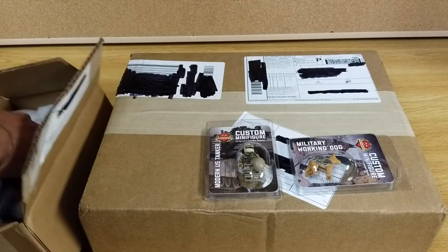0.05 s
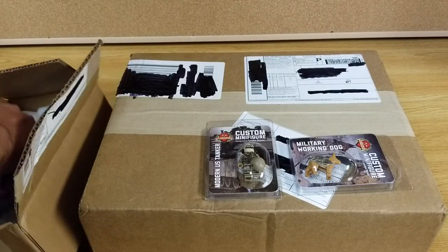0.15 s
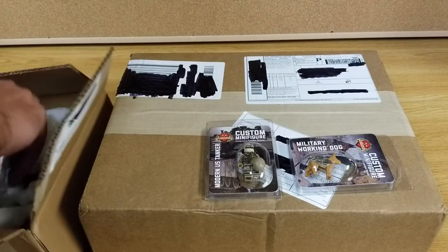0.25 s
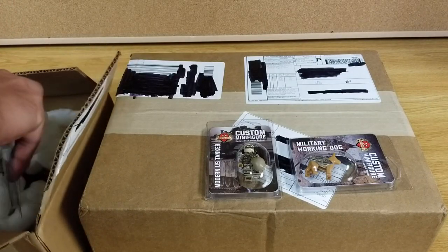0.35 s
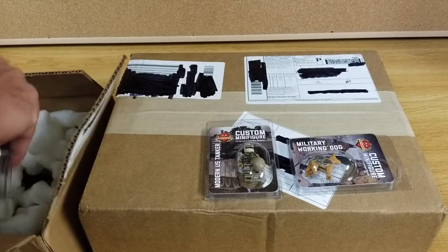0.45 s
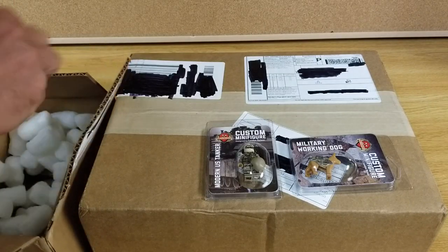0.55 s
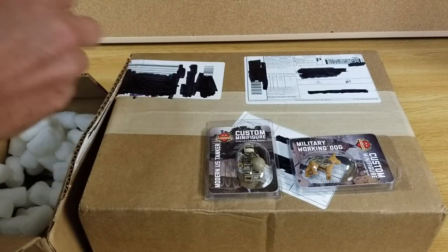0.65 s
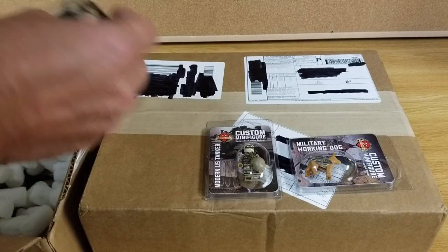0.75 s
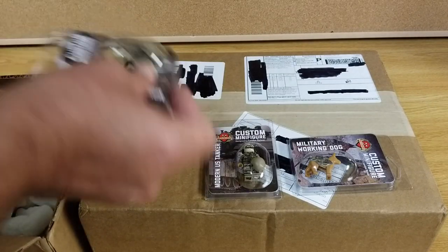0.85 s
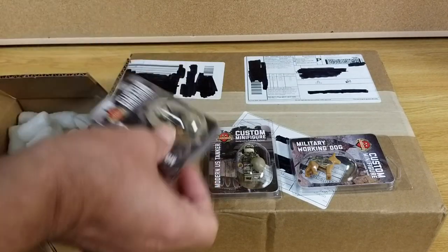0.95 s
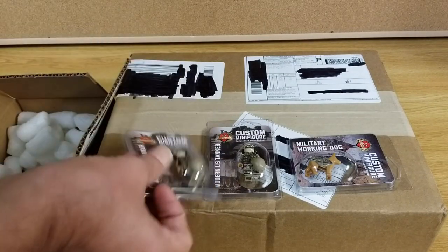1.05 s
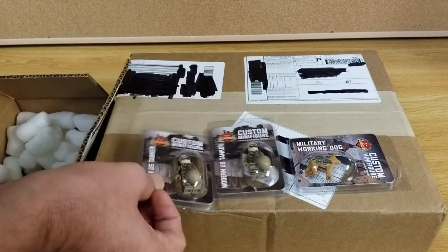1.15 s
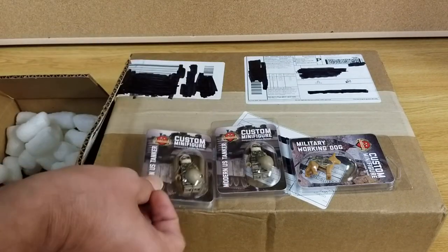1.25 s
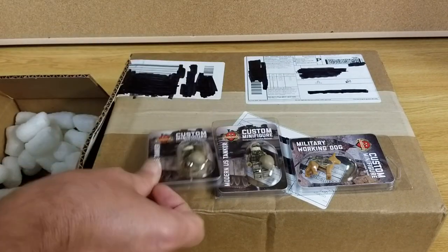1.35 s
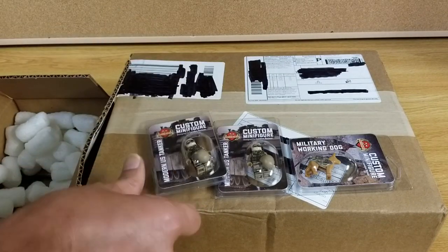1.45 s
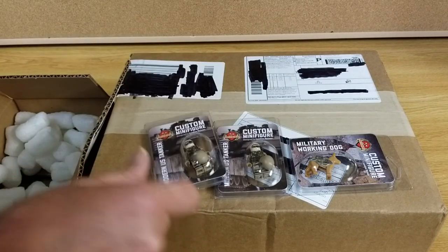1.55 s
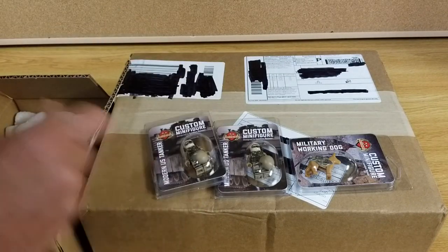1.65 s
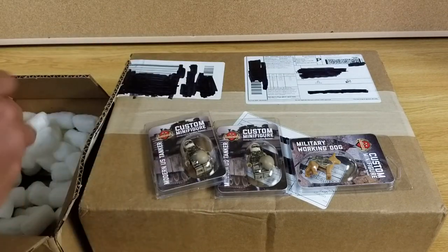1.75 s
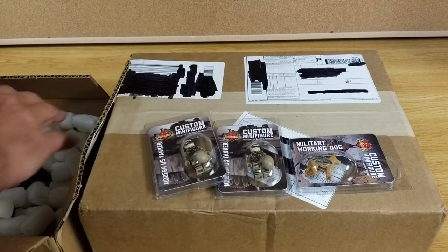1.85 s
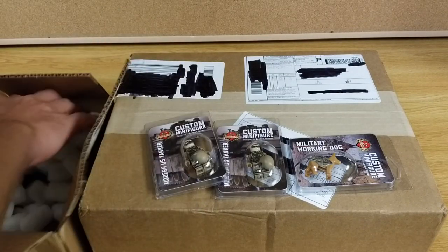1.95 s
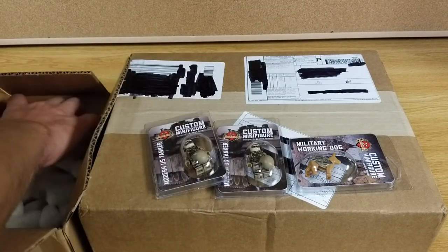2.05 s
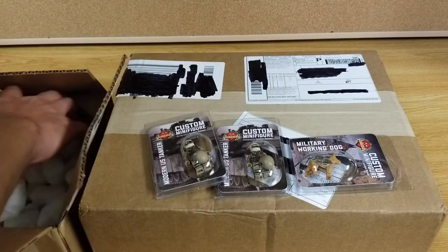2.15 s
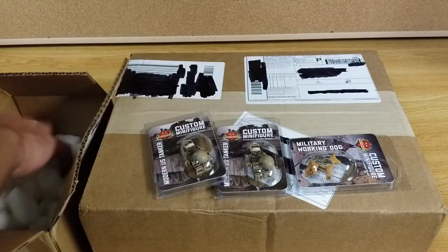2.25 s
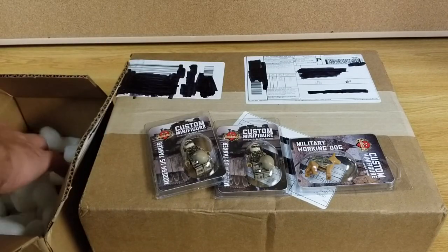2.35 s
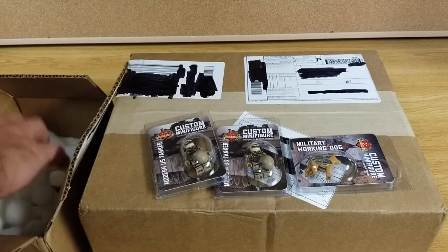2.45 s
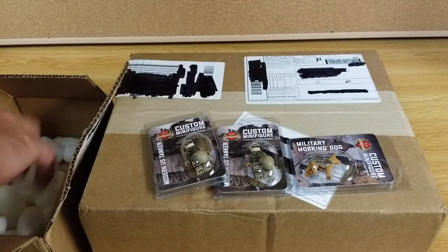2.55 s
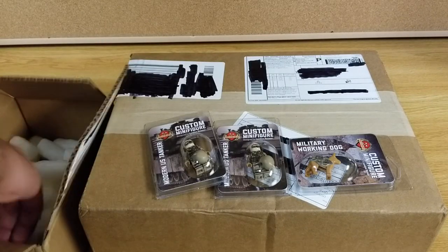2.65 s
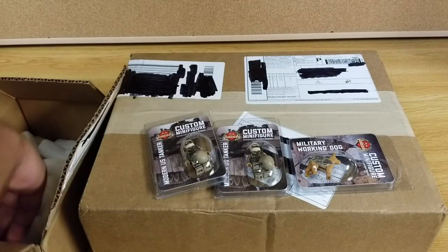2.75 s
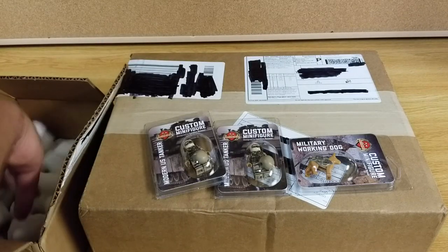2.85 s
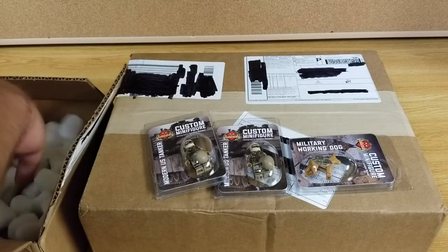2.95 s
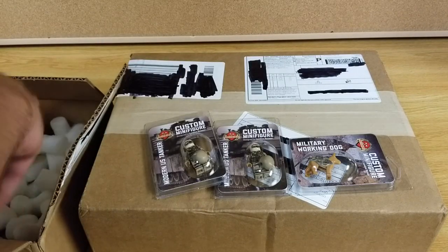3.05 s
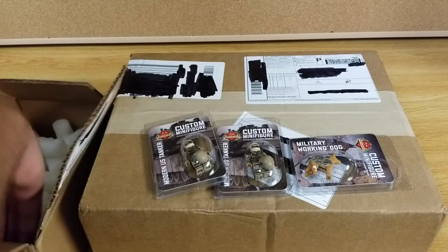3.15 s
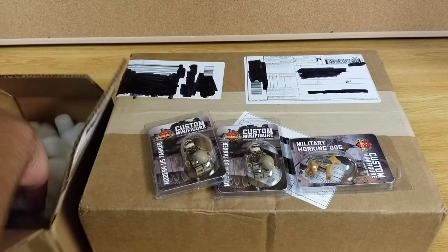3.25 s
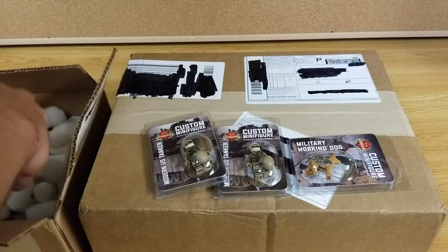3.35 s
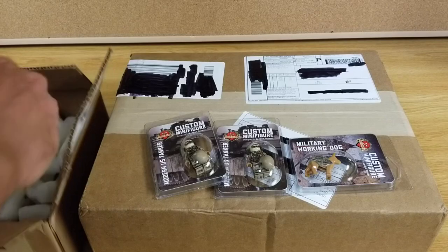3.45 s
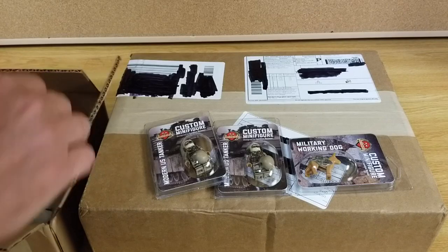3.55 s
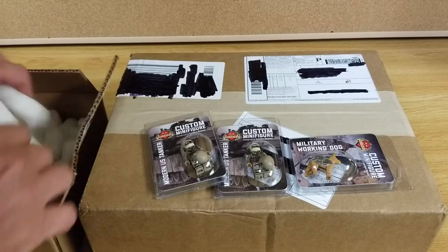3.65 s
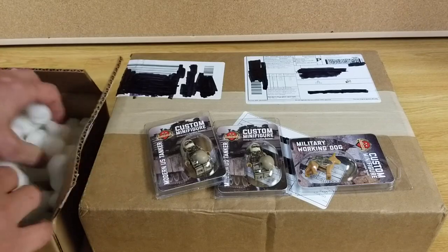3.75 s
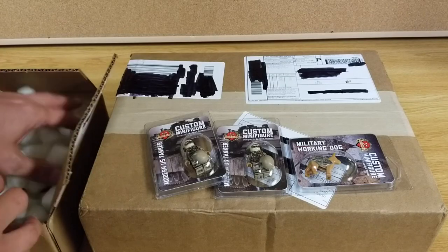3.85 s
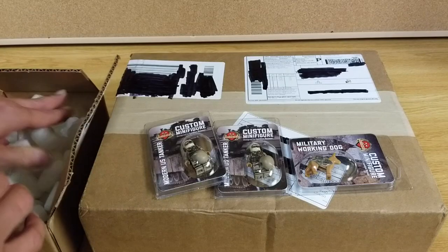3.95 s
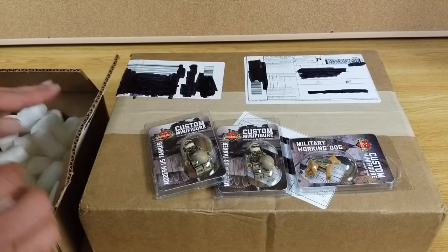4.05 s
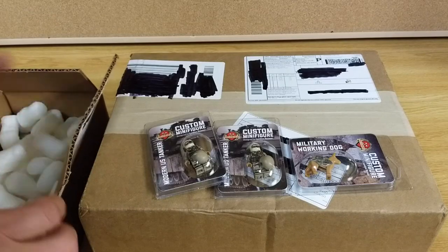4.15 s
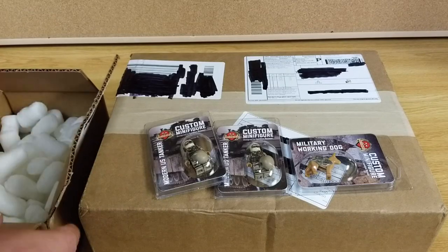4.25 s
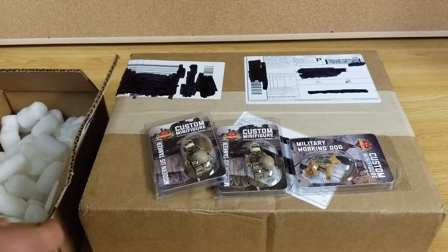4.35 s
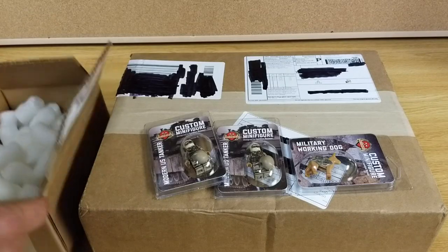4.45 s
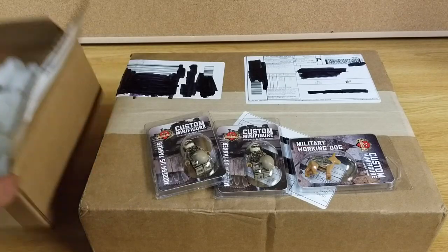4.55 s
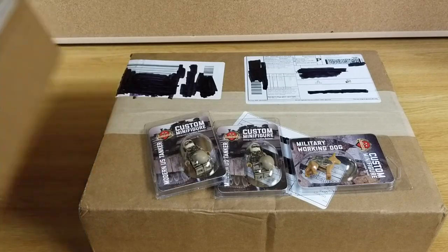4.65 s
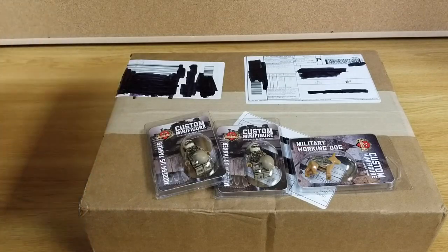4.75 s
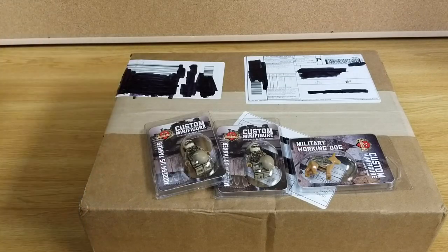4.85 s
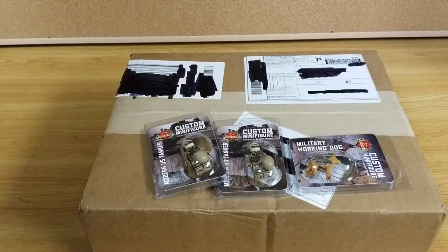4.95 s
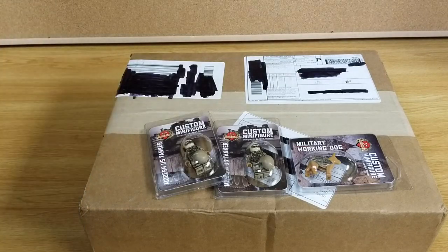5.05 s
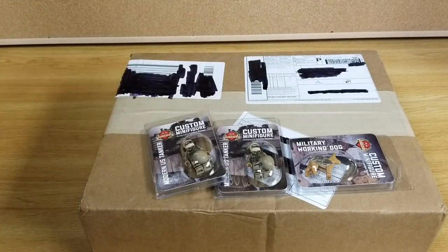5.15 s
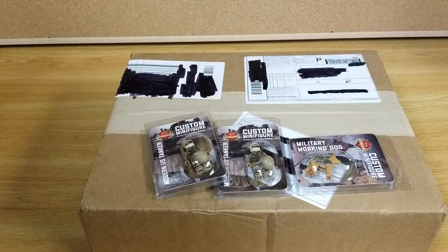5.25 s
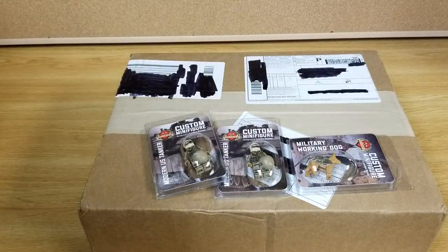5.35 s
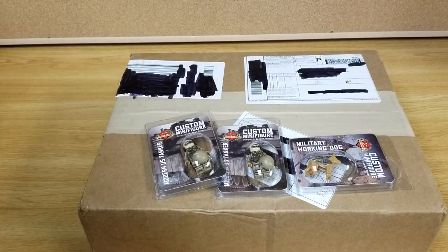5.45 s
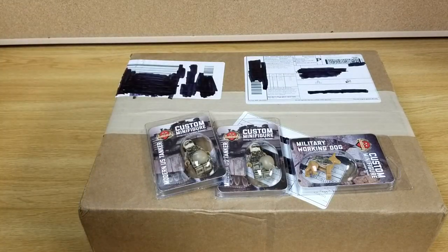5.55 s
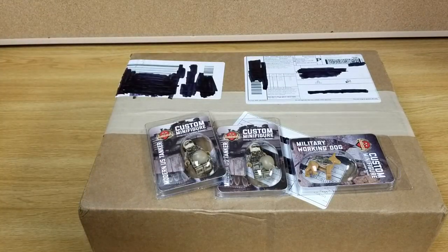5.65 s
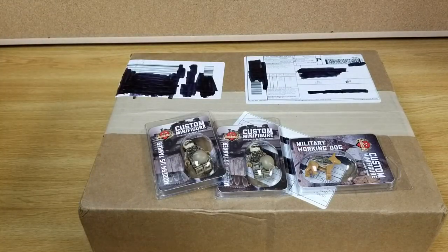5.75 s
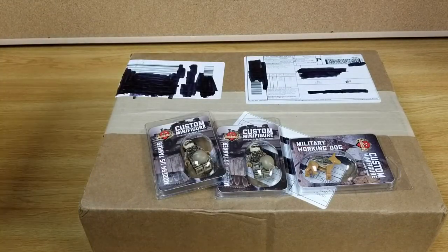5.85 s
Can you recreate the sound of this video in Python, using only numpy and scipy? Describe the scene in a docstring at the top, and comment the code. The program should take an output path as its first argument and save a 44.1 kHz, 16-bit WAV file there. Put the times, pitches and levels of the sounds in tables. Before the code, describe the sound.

Close-up in a small quiet room, a hand rummages briefly in foam packing pieces with a cardboard thud. A thin plastic pack then scrapes and clacks onto a closed hollow box. Digging resumes in short crunchy bursts with squeaks and flap bumps, then thins out to a few thuds over low rumble, mains hum and fluttering electronic hiss.

```python
"""Hands dig through foam peanuts in an open carton: slip noise, squeaks and ringing thuds from walls and flaps.
After a second a plastic blister pack scrapes onto a closed box and clacks, its shell and the lid ringing.
Then the digging resumes: foam rustles, the wall rubs in gliding resonances, flaps bump and edges tick.
Throughout, a small quiet room answers with echoes and a low rumble; the mains hum grows towards the end.
The camera's electronics add hiss of dense random clicks in a fast flutter; two sines make a thin whine."""
import sys
import numpy as np
from scipy import signal
from scipy.fft import rfft, irfft
from scipy.io import wavfile
from scipy.ndimage import uniform_filter1d

SR = 44100
rng = np.random.default_rng(int(sys.argv[2]) if len(sys.argv) > 2 else 0)


def unload_wav(signal):
    """Save mono or channel-first audio to the path in sys.argv[1] as 16-bit WAV at rate SR, clipped to [-1, 1]."""
    wavfile.write(
        sys.argv[1],
        SR,
        np.round(np.clip(np.atleast_2d(signal).T, -1, 1) * 32767).astype(np.int16),
    )


N = 261072
T = np.arange(N) / SR

# Levels in the tables are relative; each layer's mixing gains and the room come on top.
# strokes of the hand through the peanuts: [start t/s, push length t/s, foam level/dB, wall rub level/dB]
STROKES = [(.008, 0.048, -44.5, -37.5), (.072, 0.01, -43, -39.5), (.15, 0.034, -51, -48.5),
           (.51, 0.037, -72, -55.5), (.76, 0.88, -64.5, -87), (1.935, 0.086, -41, -38.5),
           (2.02, 0.024, -42.5, -41.5), (2.125, 0.12, -43.5, -42.5), (2.22, 0.059, -40.5, -35.5),
           (2.36, 0.051, -54.5, -48.5), (2.48, 0.089, -83, -51.5), (2.63, 0.075, -44, -44),
           (2.765, 0.019, -38, -37), (2.81, 0.0086, -48.5, -37.5), (2.95, 0.068, -53.5, -53),
           (3.126, 0.046, -45.5, -39.5), (3.19, 0.07, -39.5, -35.5), (3.36, 0.09, -50, -53),
           (3.485, 0.12, -48.5, -53), (3.596, 0.068, -46, -52.5), (3.715, 0.069, -46.5, -40),
           (3.82, 0.048, -49, -43), (3.875, 0.024, -56, -42), (4.37, 0.016, -51, -43.5),
           (4.46, 0.035, -60.5, -62), (4.68, 0.11, -62.5, -66), (4.874, 0.014, -54, -64),
           (5.51, 0.049, -62.5, -56), (5.69, 0.009, -43.5, -36.5), (5.752, 0.02, -45.5, -31.5),
           (5.85, 0.068, -53, -56)]
# spectrum of foam scraping on foam: [f/Hz, level/dB per Hz]
FOAM_SPECTRUM = [(300, -18), (1000, 1), (1500, 2), (2600, -1), (4000, -2), (6000, -2), (7500, -10),
                 (9200, -7), (11500, -12), (16000, -16.5)]
# resonances of the rubbed carton wall: [f/Hz, width f/Hz, level/dB]
WALL_MODES = [(338.6, 30, 2.5), (428, 57, -0.5), (573, 51, 3.5), (675, 93, -0.5), (766, 69, 2.5),
              (898, 69, 1), (1050, 470, -10)]
# glide of the wall's resonances as the hand moves along it: [t/s, shift/semitones]
WALL_GLIDE = [(.03, -2), (.085, 1), (2.06, 0.16), (3.14, -0.5), (3.25, 1.27), (3.72, -2.5), (3.92, 1.5),
              (5.7, -2), (5.78, 0.4)]
# bumps on the carton and its flaps: [t/s, level/dB, contact brightness f/Hz, chatter length t/s]
BUMPS = [(.014, -33, 1380, 0), (.023, -25, 237, .032), (0.075, -38.5, 2000, 0), (1.938, -26, 427, 0),
         (1.949, -27.5, 400, 0), (1.960, -23.5, 420, .016), (1.984, -33.5, 700, .016), (2.124, -40, 200, 0),
         (3.128, -38.5, 1000, 0), (3.147, -36, 400, .02), (3.637, -34.5, 162, 0), (3.718, -41, 700, 0),
         (4.089, -48.5, 900, 0), (4.375, -25, 68.4, 0), (4.383, -29, 108, .012), (4.378, -41, 1690, .035),
         (4.411, -31, 128, 0), (5.514, -43, 330, 0), (5.687, -21, 130, 0), (5.719, -35, 400, 0),
         (5.755, -31.5, 2300, 0), (5.789, -35, 1000, 0)]
# ringing modes of the open carton: [f/Hz, level/dB, t60 t/s]
CARTON_MODES = [(138.3, -0.5, 0.091), (243.5, -0.5, 0.1), (278.6, -1, 0.059), (343.7, 0.5, 0.077),
                (456, 2.5, 0.056), (630, 6, 0.017), (650, -8.5, 0.032), (950, -7, 0.046),
                (1324, -12, 0.073), (2160, 1.5, 0.017)]
# spectrum of crackle in thin, stiff card or plastic: [f/Hz, level/dB per Hz]
SHEET_SPECTRUM = [(350, 7.5), (700, 4.5), (1250, 8), (1850, 5), (2250, -4.5), (3000, -2), (3900, -6),
                  (5400, -8), (7000, -15.5), (9000, -13.5), (12000, -25), (16000, -29)]
# the blister pack touches down and rocks: [t/s, level/dB, contact brightness f/Hz]
CLACKS = [(1.112, -35.5, 5000), (1.122, -35.5, 9000), (1.153, -49, 8000), (1.174, -27, 2600),
          (1.1805, -32, 1400), (1.4425, -28, 3980), (1.4455, -20.5, 5100), (1.4495, -27, 3000),
          (1.4525, -23, 2000), (1.4615, -25, 3500), (1.468, -32, 6000), (1.504, -33, 4000),
          (1.513, -29.5, 3500), (1.538, -39, 2500), (1.546, -33, 3500), (1.584, -42, 4500),
          (1.637, -45.5, 5000)]
# ringing modes of its plastic shell: [f/Hz, level/dB, t60 t/s]
PACK_MODES = [(615, -2.5, 0.055), (752, -2.5, 0.052), (982, -1.5, 0.078), (1054, -11, 0.18),
              (1196, -9.5, 0.2), (1353, -12, 0.17), (1450, -16, 0.12), (1760, -14, 0.14),
              (2910, -4.5, 0.019)]
# the pack is pushed over the lid: [start t/s, push length t/s, level/dB]
SLIDES = [(1.082, 0.014, -53.5), (1.11, 0.04, -43), (1.185, 0.011, -49), (1.28, 0.17, -54.5),
          (1.442, 0.03, -42)]
# pack and fingers knock on the closed box: [t/s, level/dB, contact brightness f/Hz]
KNOCKS = [(1.111, -25, 60), (1.174, -29, 900), (1.181, -34.5, 900), (1.4455, -32, 900), (1.513, -31.5, 400),
          (1.586, -24, 65)]
# ringing modes of its hollow lid: [f/Hz, level/dB, t60 t/s]
LID_MODES = [(140.5, -2, 0.18), (424.6, 0.5, 0.13), (575, 1.5, 0.14)]
# foam squeaks: [t/s, level/dB, pitch f/Hz, fade length t/s]
SQUEAKS = [(0.075, -29, 810, 0.019), (2.001, -33, 790, 0.021), (2.386, -36.5, 1270, 0.006),
           (2.973, -39, 920, 0.052), (2.971, -41.5, 1260, 0.056), (3.127, -32.5, 590, 0.017),
           (3.233, -32.5, 790, 0.013), (3.712, -31, 600, 0.0077), (3.757, -39, 608.6, 0.02),
           (3.821, -37, 764, 0.018), (3.907, -37.5, 894, 0.027)]
# small sharp ticks: [t/s, level/dB, ring f/Hz]
TICKS = [(0.206, -35.5, 4500), (0.786, -32, 1100), (0.841, -45, 2270), (1.081, -25, 4360),
         (1.082, -29, 1260), (2.142, -37, 2630), (2.439, -28, 1020), (3.605, -28.5, 1830),
         (4.366, -40, 6150), (4.882, -37, 6570)]
# decay time of the room: [f/Hz, t60 t/s]
ROOM_T60 = [(150, 0.39), (1000, 0.21), (4000, 0.38), (12000, 0.34)]
# spectrum of the room rumble: [f/Hz, level/dB per Hz]
RUMBLE_SPECTRUM = [(25, -12), (45, -20), (65, -8), (85, -5), (130, 2), (180, -6.5), (240, -6), (320, -13.5),
                   (450, -20), (800, -29.5), (1500, -37.5), (3500, -40), (16000, -43.5)]
# mains hum, growing at the end: [t/s, level/dB]
HUM_LEVEL = [(0, -57.5), (4.3, -57.5), (5.3, -52.5), (5.92, -49)]
# steady whine: [f/Hz, level/dB]
WHINE = [(6315, -71), (8118, -74)]
# spectrum of the fluttering electronic hiss: [f/Hz, level/dB per Hz]
HISS_SPECTRUM = [(1000, -0.5), (3500, -10), (5000, -0.5), (6400, 3), (7400, 1.5), (9000, 2.5), (11000, 0.5),
                 (16000, -4)]
# slow wavering of the hiss: [t/s, level/dB]
HISS_LEVEL = [(0, -58), (.68, -64), (.8, -58.5), (1.8, -61), (2.6, -63), (2.8, -59.5), (3.8, -61.5),
              (4.25, -62), (5.3, -66.5), (5.6, -62.5)]
# swells of the hiss in each flutter cycle: [from t/s, to t/s, start in cycle 0-1, share of cycle, level/dB]
FLUTTER = [(0, 3.9, .86, .32, 7.5), (3.9, 6, .15, .22, 9), (3.9, 6, .7, .2, 10), (3.9, 6, .9, .25, 4.5)]

GRIP_S = 0.0074  # a push takes hold this quickly
TRICKLE_DB, TRICKLE_S = -12, 0.066  # a few pieces trickle on after a push
FOAM_SWELL_DB, FOAM_SETTLE_S = 2.5, 0.047  # rise during a push, and settling after it
WALL_SWELL_DB, WALL_SETTLE_S = 1, 0.046
SLIDE_SWELL_DB, SLIDE_STOP_S = 13, 0.033  # the pack scrapes louder as it gathers speed
PIECE_RUBS_PER_S, PIECE_RUB_S = 70, 0.048  # rate of single-piece rasps, and their mean decay time
WALL_LOW_HZ, WALL_HIGH_HZ = 270, 1320  # the wall radiates mainly between these
CHATTER_GAP_S, CHATTER_LOSS_DB = 0.0096, 0.4  # a loose flap touches again, a little weaker each time
SQUEAK_SAG = 0.05  # a squeak starts this share sharp
SPOTS, SPOT_CHANGES_PER_S = 6, 70  # the sound keeps moving between spots in the carton and on the box
HUM_HZ, FLUTTER_HZ = 60, 29.98
CUTOFF_HZ = 15900


def foam():
    """Peanuts scrape in clumps of slips, denser when dug harder; single pieces rasp and cell walls snap."""
    level = pushes(STROKES, FOAM_SWELL_DB, FOAM_SETTLE_S, axis=2)
    effort = level / level.max()
    clumps = from_db(1.8 * drift(140))
    scrape = colour(slips(600 + 7000 * effort, spread_db=1.5), FOAM_SPECTRUM) * clumps
    crunch = np.zeros(N)
    for hz in np.geomspace(1500, 9000, 10):
        snaps = slips(15 + 40 * effort, spread_db=2.0)
        crunch += resonate(snaps, hz, hz / 8)
    pieces = from_db(-6) * piece_rubs() + from_db(-9) * rms_one(crunch)
    return level * (from_db(-1.0) * rms_one(scrape) + pieces)


def piece_rubs():
    """One peanut at a time catches on its neighbour: a sudden, short rasp with its own pitch and length."""
    out, t = np.zeros(N), T[:SR // 16]
    rasp = slips(2500, spread_db=2.0)
    chances = rng.random((int(N / SR * PIECE_RUBS_PER_S), 4))
    for k, (when, pitch, length, size) in enumerate(chances):
        s = (k + when) / PIECE_RUBS_PER_S
        hz = 1300 * 7 ** pitch
        grit = rasp.take(int(s * SR) + np.arange(len(t)), mode="wrap")
        fade = np.exp(-t / (PIECE_RUB_S * (.5 + length)))
        add(out, s, from_db(10 * size) * resonate(grit * fade, hz, hz / 8))
    return rms_one(out)


def wall_rub():
    """Hand and foam drag on cardboard, which answers in hollow resonances that glide with the contact point."""
    drag = slips(2500, spread_db=2.0)
    shifts_db = [1.5 * drift(30) for mode in WALL_MODES]
    wall = np.zeros(N)
    for k, (hz, width, db) in enumerate(WALL_MODES):
        wall += (-1) ** k * from_db(db + shifts_db[k]) * resonate(drag, hz, width)
    wall = signal.sosfilt(signal.butter(2, (WALL_LOW_HZ, WALL_HIGH_HZ), "band", fs=SR, output="sos"), wall)
    # reading the sound faster or slower shifts all resonances together
    speed = 2 ** (np.interp(T, *np.transpose(WALL_GLIDE)) / 12)
    wall = np.interp(np.cumsum(speed) % N, np.arange(N), wall)
    return pushes(STROKES, WALL_SWELL_DB, WALL_SETTLE_S, axis=3) * rms_one(wall)


def carton_bumps():
    """Contacts ring the carton: dull thuds of the walls and chattering flaps, with a papery edge."""
    touches = []
    for s, db, hz, length in BUMPS:
        for k in range(1 + int(max(length, 0) / CHATTER_GAP_S)):
            touches.append((s + k * CHATTER_GAP_S, db - k * CHATTER_LOSS_DB, hz))
    body, crackle = strike(touches, CARTON_MODES, crack_s=0.037)
    return body + from_db(3.5) * colour(crackle, SHEET_SPECTRUM)


def blister_pack():
    """Thin plastic scrapes over the lid by stick-slip, slaps down and rocks; knocks ring the hollow box."""
    shell, crackle = strike(CLACKS, PACK_MODES, crack_s=0.0041)
    lid, _ = strike(KNOCKS, LID_MODES, crack_s=1)
    slap = from_db(13.5) * colour(crackle, SHEET_SPECTRUM)
    drag = slips(1200, spread_db=2.5)
    sung = rms_one(sum(from_db(db) * ring(drag, hz, t60) for hz, db, t60 in PACK_MODES))
    scrape = from_db(11.0) * colour(drag, SHEET_SPECTRUM) + from_db(-13.0) * sung
    return shell + lid + slap + pushes(SLIDES, SLIDE_SWELL_DB, SLIDE_STOP_S, axis=2) * scrape


def squeaks():
    """Foam sticks and slips almost regularly for a moment: a short, rough tone that sags in pitch."""
    out = np.zeros(N)
    for s, db, hz, length in SQUEAKS:
        age = np.maximum(T - s, 0) / length
        swell = np.minimum(age * 20, 1) * np.exp(-age ** 2) * from_db(2.5 * drift(500))
        pitch = hz * (1 + SQUEAK_SAG * np.exp(-5 * age) + .085 * drift(900))
        out += from_db(db) * swell * np.sin(2 * np.pi * np.cumsum(pitch) / SR)
    return out


def ticks():
    """Stiff edges snap: a fast-fading noise burst with a brief bright ring."""
    out, t = np.zeros(N), T[:SR // 20]
    for (s, db, hz), grit in zip(TICKS, rng.standard_normal((len(TICKS), len(t)))):
        snap = grit * np.exp(-t / 0.0058)
        add(out, s, from_db(db) * (0.12 * snap + 1.9 * resonate(snap, hz, hz / 6)))
    return out


def stroke(start, length, swell_db, settle_s):
    """Gain of one push: quick grip, a swell while it lasts, a fast release and a faint slower tail."""
    age, after = np.maximum(T - start, 0), np.maximum(T - start - length, 0)
    push = np.minimum(age / GRIP_S, 1) * from_db(swell_db * (np.minimum(age / length, 1) - 1))
    trickle = from_db(TRICKLE_DB)
    return push * ((1 - trickle) * np.exp(-after / settle_s) + trickle * np.exp(-after / TRICKLE_S))


def pushes(rows, swell_db, settle_s, axis):
    """Gain over time of a table of pushes, levels in column axis; overlapping pushes add in power."""
    power = np.zeros(N)
    for row in rows:
        power += (from_db(row[axis]) * stroke(row[0], row[1], swell_db, settle_s)) ** 2
    return np.sqrt(power)


def strike(contacts, modes, crack_s):
    """Contacts ring a body's modes and crackle briefly at each touch; soft contacts push for longer."""
    force, crackle, t = np.zeros(N), np.zeros(N), T[:SR // 10]
    for (s, db, bright_hz), grit in zip(contacts, rng.standard_normal((len(contacts), len(t)))):
        push = t * np.exp(-2 * np.pi * bright_hz * 2 * t)
        add(force, s, from_db(db) * push / push.sum())
        add(crackle, s, from_db(db) * np.sqrt(bright_hz / SR) * grit * np.exp(-t / crack_s))
    body = np.zeros(N)
    for k, (hz, db, t60) in enumerate(modes):
        body += (-1) ** k * from_db(db) * ring(force, hz, t60)
    return body, crackle


def slips(per_s, spread_db):
    """Random clicks of very uneven size, as in stick-slip friction; rms 1."""
    sizes = from_db(spread_db * np.minimum(rng.exponential(1, N), 4)) * rng.choice([-1, 1], N)
    happens = rng.random(N) < per_s / SR
    return rms_one(sizes * happens / np.sqrt(per_s))  # the root keeps the power even at any rate


def ring(x, hz, t60):
    """A damped mode: a unit click sets a sine of height 1 ringing."""
    r, w = from_db(-60 / (t60 * SR)), 2 * np.pi * hz / SR
    return signal.lfilter([0, np.sin(w)], [1, -2 * r * np.cos(w), r * r], x + 1e-18)


def resonate(x, hz, width_hz):
    """A resonance with gain 1 on top."""
    r = np.exp(-np.pi * width_hz / SR)
    feedback = [1, -2 * r * np.cos(2 * np.pi * hz / SR), r * r]
    return signal.lfilter(np.array([1, 0, -1]) * (1 - r * r) / 2, feedback, x + 1e-18)


def colour(x, spectrum):
    """Shape by a spectrum, keeping the power of white noise; the bass below the table falls away."""
    hz = np.arange(len(x) // 2 + 1) * SR / len(x)
    gain = from_db(at_hz(spectrum, hz)) * np.minimum(hz / spectrum[0][0], 1) ** 2
    return irfft(rfft(x) * rms_one(gain), len(x))


def drift(rate):
    """Random wandering at unit rms, with rate turning points a second joined by straight lines."""
    knots = rng.standard_normal(N // 20)
    return rms_one(np.interp(T * rate, np.arange(len(knots)), knots))


def add(out, s, sound):
    """Mix a short sound in at time s."""
    i = max(round(s * SR), 0)
    out[i:i + len(sound)] += sound[:N - i]


def from_db(db):
    """Decibels to gain."""
    return 10 ** (np.asarray(db) / 20)


def rms_one(x):
    """Scale to unit power."""
    return x / np.sqrt(np.mean(x ** 2) + 1e-20)


def at_hz(points, hz):
    """Read a table on a log-frequency axis."""
    freqs, values = np.transpose(points)
    return np.interp(np.log(np.maximum(hz, 1)), np.log(freqs), values)


def room(x, wet_db, early_db, early_s):
    """Desk and boxes scatter the treble, then a tail decays band by band; each spot has its own echoes."""
    t = T[:SR // 2]
    edges = np.geomspace(60, 16000, 9)
    spot = rng.integers(0, SPOTS, N)[(T * SPOT_CHANGES_PER_S).astype(int)]
    out = x.copy()
    for k in range(SPOTS):
        tail = 0
        for low, high in zip(edges, edges[1:]):
            band_filter = signal.butter(2, [low, high], "band", fs=SR, output="sos")
            band = signal.sosfilt(band_filter, rng.standard_normal(len(t)))
            tail = tail + band * from_db(-60 * t / at_hz(ROOM_T60, np.sqrt(low * high)))
        scatter = rng.standard_normal(len(t)) * np.exp(-t / early_s) * (t > .001)
        early = signal.sosfilt(signal.butter(1, 1500, "high", fs=SR, output="sos"), scatter)
        response = from_db(wet_db) * rms_one(tail * (t > .004)) + from_db(early_db) * rms_one(early)
        # smooth fades between spots
        here = np.sin(np.pi / 2 * uniform_filter1d((spot == k) * 1., SR // SPOT_CHANGES_PER_S))
        out += signal.fftconvolve(x * here, response / np.sqrt(len(t)))[:N]
    return out


def background():
    """Noise rumble, sines for hum and whine, and gritty electronic hiss fluttering about thirty times a second."""
    rumble = from_db(-47.5) * colour(rng.standard_normal(N), RUMBLE_SPECTRUM)
    tones = [(HUM_HZ, np.interp(T, *np.transpose(HUM_LEVEL)))] + WHINE
    steady = np.zeros(N)
    for hz, db in tones:
        steady += from_db(db) * np.sqrt(2) * np.sin(2 * np.pi * (hz * T + rng.random()))
    swell_db = np.zeros(N)
    for start, end, phase, share, db in FLUTTER:
        in_swell = (T * FLUTTER_HZ - phase) % 1 < share
        swell_db += db * ((T >= start) & (T < end) & in_swell)
    flicker_db = 1.3 * drift(90)
    hiss_gain = from_db(np.interp(T, *np.transpose(HISS_LEVEL)) + swell_db + flicker_db)
    hiss = hiss_gain * colour(slips(20000, spread_db=7.5), HISS_SPECTRUM)
    return rumble + steady + hiss


def scene():
    """Everything handled on the desk sounds in the same room, over the background."""
    handling = foam() + wall_rub() + carton_bumps() + blister_pack() + squeaks() + ticks()
    return (room(handling, wet_db=-6.0, early_db=-6.5, early_s=0.0044) + background())[None]


def record(dry):
    """A steep low-pass cuts the top."""
    return signal.sosfilt(signal.ellip(12, .1, 70, CUTOFF_HZ, fs=SR, output="sos"), dry)


dry = scene()
out = record(dry)
unload_wav(out)
```